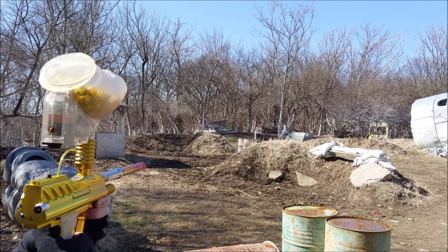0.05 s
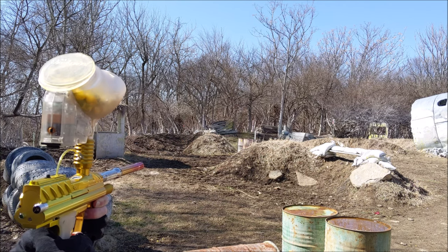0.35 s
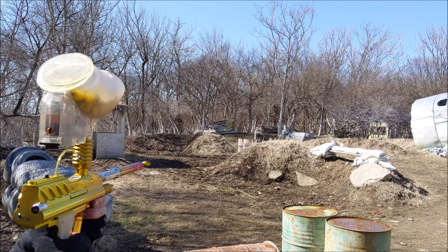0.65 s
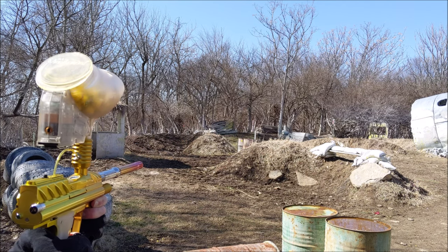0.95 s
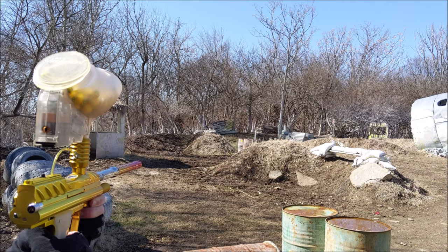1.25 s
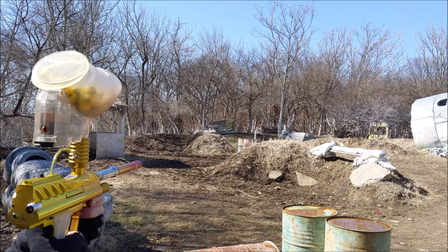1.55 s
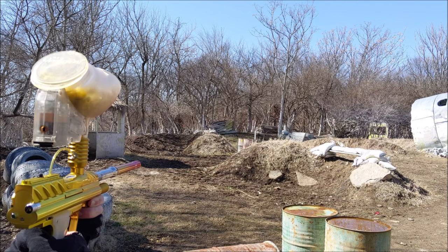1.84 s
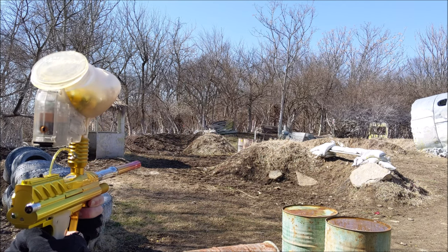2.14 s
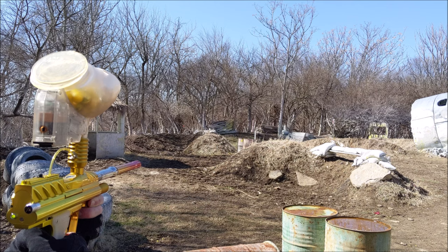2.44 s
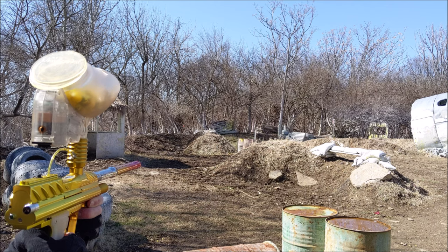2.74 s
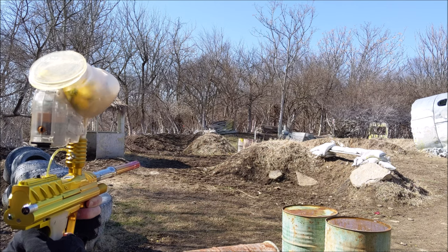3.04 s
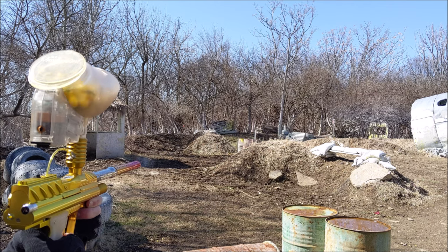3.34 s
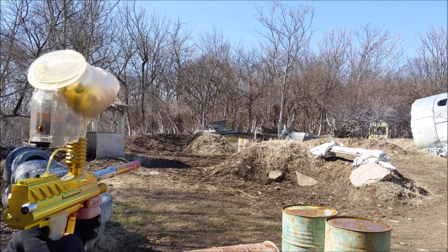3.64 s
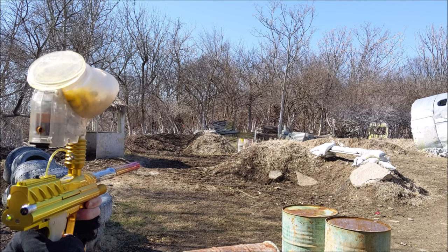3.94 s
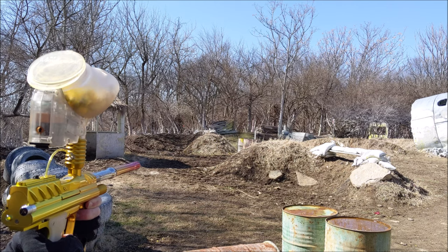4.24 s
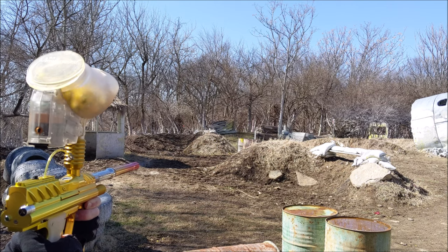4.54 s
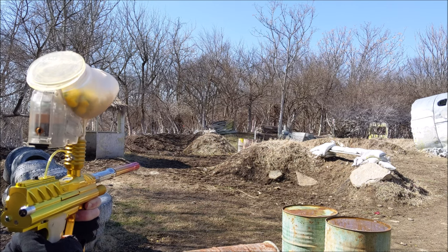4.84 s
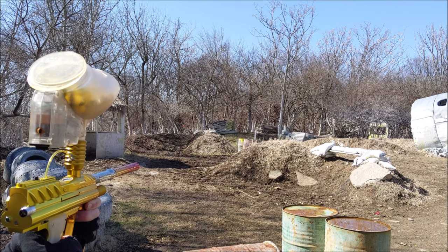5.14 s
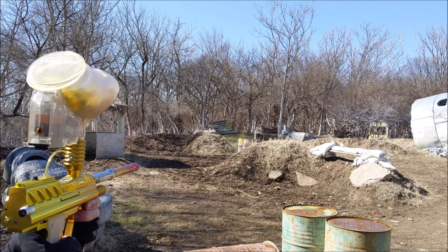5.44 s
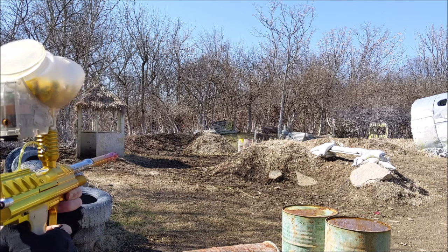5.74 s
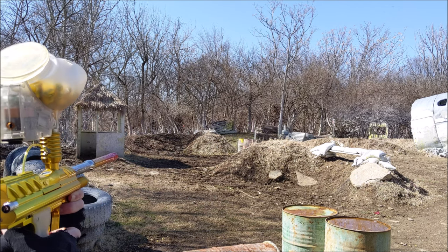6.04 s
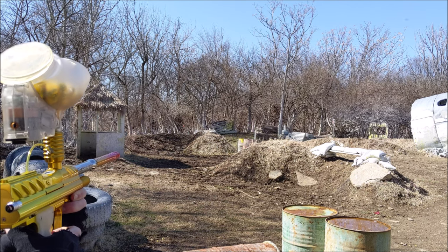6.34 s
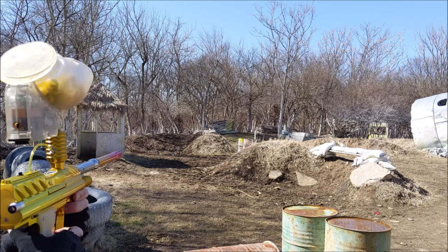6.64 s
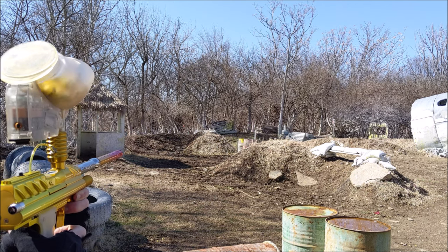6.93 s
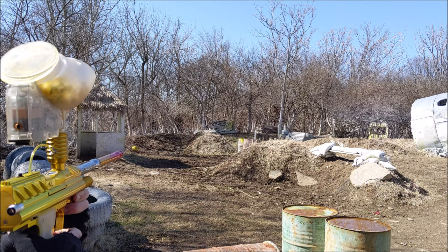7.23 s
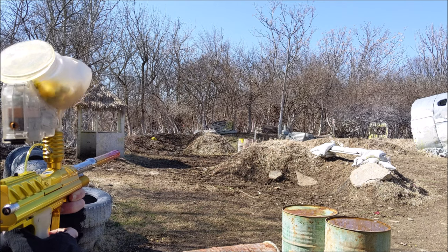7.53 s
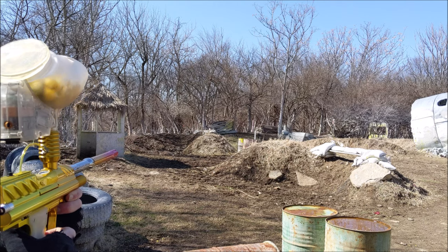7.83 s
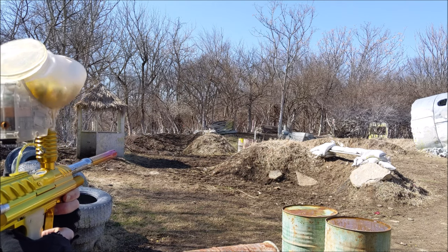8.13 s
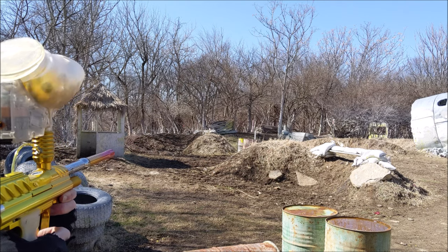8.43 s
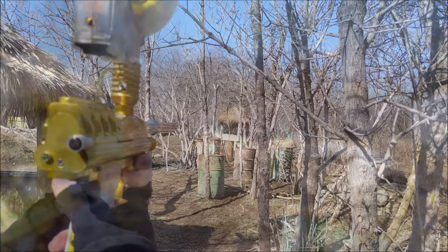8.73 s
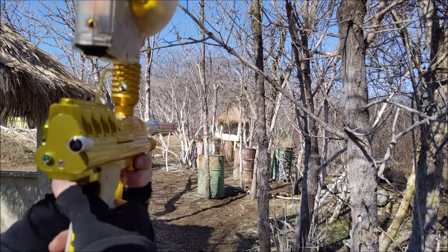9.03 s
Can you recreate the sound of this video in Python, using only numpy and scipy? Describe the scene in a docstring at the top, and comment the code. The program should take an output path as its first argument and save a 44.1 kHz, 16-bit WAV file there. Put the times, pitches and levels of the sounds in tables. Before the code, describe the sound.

A close paintball gun fires three single shots, then two rapid bursts outdoors, with hollow gassy pops and balls splatting on distant metal.

```python
"""A light breeze blows over an open field, and a paintball gun, held close, fires three single shots.
Each shot is a trigger tick, a hollow pop from the barrel, and a crack and hiss of escaping gas.
Ground, hut and woods echo it, and a quarter second later some balls splat on distant sheet metal.
A long burst of shots follows, then a shorter one. Near the end the sound switches abruptly to a
quieter spot, with a few soft bumps of carried gear and one faint, brief tone."""
import sys
import numpy as np
from scipy import signal
from scipy.fft import rfft, irfft, next_fast_len
from scipy.io import wavfile

SR = 44100
rng = np.random.default_rng(int(sys.argv[2]) if len(sys.argv) > 2 else 0)


def put_to_file(sound):
    """Save the sound as 16-bit audio at rate SR, in the file named by the first command-line argument."""
    columns = np.atleast_2d(sound).T  # one column per channel
    safe = np.clip(columns, -1, 1)
    whole_steps = np.round(safe * 32767)
    wavfile.write(sys.argv[1], SR, whole_steps.astype(np.int16))


N = 404838
TIME = np.arange(N) / SR

# A COLOUR table says how strong a noise is at each pitch, compared with its other pitches.
# low rumble of the wind: pitch_hz, level_db
WIND_COLOUR = [(20, -4), (50, 0), (85, -4), (130, -15), (220, -28), (1000, -70)]
# breeze in the trees and faint hiss: pitch_hz, level_db
FIELD_COLOUR = [(30, -5), (120, 1.5), (300, -0.5), (600, -1), (880, -2), (1150, -17.5), (2000, -19),
                (4200, -18.5), (5700, -16), (7600, -10), (8600, -20.5), (9500, -13.5), (13000, -25),
                (16000, -22.5)]
# hush of the quieter spot: pitch_hz, level_db
QUIET_COLOUR = [(15, -38), (25, -17), (175, -21.5), (503, -22), (714, -27.5), (775, -13), (962, -27.5),
                (1480, -27.5), (2110, -39), (2350, -32.5), (4740, -43), (16000, -49)]
# how alike noise is on the left and right: pitch_hz, likeness (1 = the same)
STEREO_LIKENESS = [(60, 1), (130, 0.41), (300, 0), (640, 0.35), (1400, 0), (3000, 0), (16000, 0.0096)]
# soft knocks of carried gear: start_s, level_db
GEAR_BUMPS = [(8.816, -36.5), (8.922, -41), (9.018, -36), (9.064, -44)]
# their dull thud: pitch_hz, level_db
BUMP_COLOUR = [(40, -10.5), (160, -9.5), (350, -20), (1000, -29), (4000, -36)]
# balls that hit the metal squarely: start_s, level_db, ring_db (added to level_db)
SQUARE_HITS = [(0.3747, -26.5, -15), (1.1579, -18.5, 3), (1.9492, -16, -6), (2.815, -21, 1),
               (2.9526, -17, -6), (3.11, -19, -4), (3.2665, -17.5, -8), (4.1813, -21.5, -20),
               (4.479, -16.5, 0.5), (4.782, -17.5, -1), (5.0942, -22.5, -14), (5.2562, -17.5, 1.5),
               (5.3932, -17.5, -9.5), (5.8263, -26.5, -19)]
# a ball bursting on the metal: pitch_hz, level_db
HIT_COLOUR = [(88, -28.5), (150, -10.5), (217, -5.5), (286, -12.5), (321, -12.5), (702, -7.5), (1290, -12),
              (2450, -12), (2870, -8), (4760, -15), (6770, -23), (9630, -18.5), (16000, -27.5)]
# how long the metal shimmers: pitch_hz, fade_s (always the time to fall by 60 dB)
SHIMMER_FADES = [(200, 0.45), (1400, 0.74), (3500, 0.56), (10000, 0.3)]
# clusters of close notes in the metal sheet: pitch_hz, width_hz, level_db
SHEET_NOTES = [(2860, 60, 0), (3170, 140, -8), (3620, 60, -14)]
# sound scattered by the trees: pitch_hz, level_db
WOODS_COLOUR = [(50, -36.5), (150, 4), (230, -0.5), (330, -2.5), (600, -6.5), (900, 2), (1300, -11),
                (3000, -7.5), (5500, -14), (10000, -22.5), (16000, -34)]
# how long it lingers: pitch_hz, fade_s
WOODS_FADES = [(150, 0.8), (900, 1.26), (3000, 0.69), (10000, 1)]
# echoes from far mounds and the tree line: delay_s, level_db, spread_s
FAR_SWELLS = [(0.11, -34, 0.0049), (0.163, -36.5, 0.0047), (.225, -42.5, 0.032)]
# their softened sound: pitch_hz, level_db
SWELL_COLOUR = [(60, -25), (230, -3), (500, -4), (900, 3), (1200, -5), (1550, -4), (2000, -8),
                (3000, -9), (8000, -20), (16000, -32)]
# shots whose puff of air reaches the microphone: start_s, pressure (push +, pull -)
STRONG_PUFFS = [(1.68, 0.21), (2.69, -0.099), (2.84, 0.22), (2.99, 0.098), (4.37, .21), (4.83, 0.12),
                (4.98, -.085), (5.28, -0.088), (5.71, 0.056), (7.10, -0.053), (7.29, 0.085), (7.44, 0.098),
                (8.03, 0.11), (8.18, 0.11)]
# notes of the trigger's knock: pitch_hz, fade_s, level_db
KNOCK_NOTES = [(410, 0.028, -24.0), (950, 0.012, -24.5)]
# a soft, low rush of noise that starts with the knock: pitch_hz, level_db
RUSH_COLOUR = [(150, 7.5), (600, 0.0), (1500, -5.0), (4000, -14.5), (8000, -25), (16000, -39.5)]
# the jet of gas: pitch_hz, left_db, right_db
GAS_COLOUR = [(59.2, -46, -28), (252, 7, 14), (1070, -1, -10.5), (1423, -2.5, 2.5), (1850, -1, -4.5),
              (2910, 6, -1), (4400, -11.5, 4), (5020, -8.5, -6), (5607, -8.5, 4.5), (6710, -16.5, -7.5),
              (7440, -2, 3.5), (8500, -6.5, -7), (9300, -3, -1.5), (12940, -12, -7.5), (16000, -22.5, -8)]
# gas cracks from valve, muzzle, exhaust and bolt: delay_s, left_db, right_db, fade_s
GAS_CRACKS = [(-.0018, -39.5, -30.5, 0.0085), (.0007, -25, -16.5, 0.0081), (.0025, -7, -9.5, 0.0098),
              (.0062, -11, -14, 0.013)]
# notes of the air in the gun's barrel and body: pitch_hz, rise_s, left_db, right_db
BARREL_NOTES = [(134.5, 0.0033, -13.5, -12), (499.3, 0.0013, -20.5, -9), (593, 0.002, -7.5, -30.5),
                (880.3, 0.0018, -9, -14.5), (978.3, 0.0021, -26, -10.5), (1572, 0.0022, -22, -20.5),
                (2233, 0.0016, -34, -21.5), (2880, 0.001, -23, -31)]
# echoes from body, ground and hut: delay_s, cutoff_hz, left_db, right_db
NEAR_ECHOES = [(.00323, 520, -14, -2), (.0052, 370, -24, -4), (.00825, 550, -10, -1),
               (.0187, 830, -20, -8.5), (.0212, 1550, -12.5, -8.5)]
# the pop scattered by nearby clutter: pitch_hz, level_db
CLUTTER_COLOUR = [(60, -30), (130, -14), (240, 0), (300, -5), (380, 2), (560, 0), (700, -9),
                  (950, -8), (1300, -24), (4000, -45)]
# trigger pulls, one shot each: start_s, gas_db
TRIGGER_PULLS = [(0.1187, 3.5), (0.894, 5.5), (1.6799, 7.5), (2.545, 5), (2.6922, 2.5), (2.8435, 6.5),
                 (2.9936, 4.5), (3.1497, 2.5), (3.3017, 3), (3.4611, 1), (3.6123, 3.5), (3.7699, -0.5),
                 (3.923, 3.5), (4.0799, 5), (4.2212, 3.5), (4.374, 4.5), (4.5208, 4.5), (4.6763, 3.5),
                 (4.8297, 6.5), (4.9836, 5), (5.1306, 4), (5.2761, 5), (5.4278, 4), (5.5722, 1.5),
                 (5.7114, 5.5), (6.6364, 7.0), (6.914, 5.5), (7.102, 7), (7.2907, 1), (7.4443, 3),
                 (7.5891, 3), (7.7387, 4.5), (7.8811, 3.5), (8.0313, 5.5), (8.181, 5), (8.3309, 5.5),
                 (8.594, 6)]

GROUND_ECHO_S, HUT_ECHO_S = .00825, .0212
GUN_ASIDE_S, GUN_ASIDE_DB = 5.4, -0.5   # the gun is moved aside, so its pop arrives weaker
QUIET_SPOT_S = 8.865


def from_db(db):
    """Turns decibels into a number to multiply by."""
    return 10 ** (np.asarray(db) / 20)


def unit_level(x):
    """Scales a sound to an average power of 1."""
    return x / np.sqrt(np.mean(x ** 2) + 1e-20)


def at_hz(table, hz):
    """Reads between a table's rows, with octaves evenly spaced."""
    table = np.array(table)
    return np.interp(np.log(np.maximum(hz, 1)), np.log(table[:, 0]), table[:, 1])


def nearest(times, moments):
    """Finds which of the times is closest to each moment."""
    return np.abs(np.subtract.outer(moments, times)).argmin(axis=1)


def lowpass(x, hz, order=2):
    """Dulls a sound by turning down what lies above hz."""
    return signal.sosfilt(signal.butter(order, min(hz, .45 * SR), fs=SR, output="sos"), x + 1e-18)


def delayed(x, delay_s):
    """Makes a stereo sound start later."""
    return np.pad(x, ((0, 0), (int(delay_s * SR), 0)))[:, :x.shape[1]]


def clicks(times, heights):
    """Puts one click at each time."""
    out = np.zeros(N)
    out[np.clip(np.round(np.asarray(times) * SR).astype(int), 0, N - 1)] = heights
    return out


def play_at(times, gains, sound):
    """Starts a copy of the sound at each time."""
    return signal.fftconvolve([clicks(times, gains)], np.atleast_2d(sound), axes=1)[:, :N]


def fading(times, gains, fade_s):
    """A loudness curve that jumps at each time, then fades; overlaps add in power."""
    power_kept = from_db(-60 / (fade_s * SR)) ** 2
    return np.sqrt(signal.lfilter([1], [1, -power_kept], clicks(times, gains ** 2) + 1e-18))


def noise(left, right=None):
    """Stereo noise, alike in the bass, with one colour for both sides or one for each."""
    size = next_fast_len(N)
    hz = np.arange(size // 2 + 1) * SR / size
    shared, opposite = rfft(rng.standard_normal((2, size)))
    alike = np.clip(at_hz(STEREO_LIKENESS, hz), -1, 1)
    both = np.sqrt(1 + alike) * shared + np.sqrt(1 - alike) * opposite * [[1], [-1]]
    colour = from_db([at_hz(left, hz), at_hz(left if right is None else right, hz)])
    return unit_level(irfft(both * colour, size)[:, :N])


def fading_noise(times, gains, colour, fades):
    """Bursts of noise in which each octave fades at its own speed."""
    rest, out = noise(colour), 0
    for hz in 250 * 2. ** np.arange(7):
        split = signal.butter(2, min(hz * np.sqrt(2), .45 * SR), fs=SR, output="sos")
        band = signal.sosfiltfilt(split, rest)
        rest = rest - band
        out = out + band * fading(times, gains, at_hz(fades, hz))
    return out


def wind():
    """A light breeze rumbles, then eases to a steady level."""
    level_db = np.interp(TIME, [.9, 1.3], [-47.5, -50.5])
    return from_db(level_db) * noise(WIND_COLOUR)


def quiet_spot(tone_hz=783, peak_s=8.98, width_s=0.036):
    """A steady hush, in which a thin, distant tone briefly swells and fades."""
    swell = np.exp(-((TIME - peak_s) / width_s) ** 2)
    tone = from_db(-47) * swell * np.sin(2 * np.pi * tone_hz * TIME)
    return from_db(-53.5) * noise(QUIET_COLOUR) + tone


def gear_bumps():
    """Carried gear knocks dully."""
    times, level_db = np.transpose(GEAR_BUMPS)
    return lowpass(noise(BUMP_COLOUR) * fading(times, from_db(level_db), fade_s=0.2), hz=1200)


def ball_landings(times, flight_s=.262):
    """After its flight, each ball faintly grazes the metal or hits it squarely."""
    late, loud = rng.standard_normal((len(times), 2)).T
    start_s = times + flight_s + 0.0078 * late
    level_db = -46.5 + 14 * loud
    ring_db = np.full(len(times), -24)
    hits = np.column_stack([start_s, level_db, ring_db])
    hits[nearest(times + flight_s, np.array(SQUARE_HITS)[:, 0])] = SQUARE_HITS
    return hits


def splats(hits):
    """Balls crack open on sheet metal, which shimmers and rings near one pitch."""
    times, level_db, ring_db = np.transpose(hits)
    gains = from_db(level_db)
    crack = from_db(-3.5) * noise(HIT_COLOUR) * fading(times, gains, fade_s=0.013)
    shimmer = from_db(-9.5) * fading_noise(times, gains, HIT_COLOUR, SHIMMER_FADES)
    ring = 0
    for hz, width_hz, db in SHEET_NOTES:
        band = signal.butter(2, [hz - width_hz / 2, hz + width_hz / 2], "band", fs=SR, output="sos")
        ring = ring + from_db(db) * unit_level(signal.sosfilt(band, rng.standard_normal((2, N))))
    # the ring builds up as waves cross the sheet
    build_up = lowpass(fading(times, from_db(level_db + ring_db), fade_s=0.54), hz=9.0, order=1)
    ring = from_db(-15.0) * ring * build_up
    return (crack + shimmer + ring) * from_db([[-1], [1]])   # a little to the right


def over_ground(x):
    """Soft ground bounces back the low pitches, which makes a sound hollow."""
    return (x + .65 * delayed(lowpass(x, hz=700), GROUND_ECHO_S)) / np.sqrt(2)


def woods_echo(times):
    """Trees scatter each shot into a long tail; mounds and the tree line send back soft swells."""
    tail = from_db(-32.0) * fading_noise(times + 0.01, 1, WOODS_COLOUR, WOODS_FADES)
    swells = sum(from_db(db) * np.exp(-((TIME[:SR] - delay_s) / spread_s) ** 2)
                 for delay_s, db, spread_s in FAR_SWELLS)
    far_echo = noise(SWELL_COLOUR)[:, :SR] * swells
    return over_ground(tail + play_at(times, 0.98, far_echo))


def air_puffs(times):
    """Each shot stirs the air; some blow right at the microphone, which swings slowly back to rest."""
    pressures = 0.017 * rng.standard_normal(len(times))
    strong_times, strong_pressures = np.transpose(STRONG_PUFFS)
    pressures[nearest(times, strong_times)] = strong_pressures
    t = TIME[:SR // 2]
    push = 2.6 * (1 - np.exp(-t / .007)) ** 2 * np.exp(-t / .045) * np.cos(2 * np.pi * 5.2 * t)
    return play_at(times + .002, pressures, push)


def trigger(times, lead_s=0.0172):
    """A catch lets go with a small knock; a soft, low rush starts with it and lingers after the shot."""
    t = TIME[:SR // 20]
    knock = sum((-1) ** k * from_db(db - 60 * t / fade_s) * np.sin(2 * np.pi * hz * t)
                for k, (hz, fade_s, db) in enumerate(KNOCK_NOTES))
    rush = from_db(-38) * noise(RUSH_COLOUR) * fading(times - lead_s, 1, fade_s=0.22)
    return play_at(times - lead_s, 0.55, knock) + rush


def escaping_gas(times, gas_db):
    """Gas cracks out as valve and bolt open, then hisses away; the hut echoes both."""
    jet = np.array(GAS_COLOUR)
    fresh, pattern = (noise(jet[:, [0, 1]], jet[:, [0, 2]]) for _ in range(2))
    # half of the cracks' power is the same noise on every shot, so they sound alike
    repeated = play_at(times + GAS_CRACKS[0][0], 1, pattern[:, :SR // 8])
    crack_power = 0
    for delay_s, left_db, right_db, fade_s in GAS_CRACKS:
        crack = fading(times + delay_s, from_db(.5 * gas_db), fade_s)
        crack_power = crack_power + (from_db([[left_db], [right_db]]) * crack) ** 2
    hiss = from_db([[-26], [-23]]) * fading(times + 0.0052, from_db(gas_db), fade_s=0.21)
    gas = repeated * np.sqrt(crack_power / 2) + fresh * np.sqrt(crack_power / 2 + hiss ** 2)
    return gas + from_db(-16.5) * delayed(gas, HUT_ECHO_S)


def pitch_drop(x, hz=480, width_hz=650):
    """An all-pass filter makes the lows arrive late, so a pop drops in pitch."""
    radius = np.exp(-np.pi * width_hz / SR)
    feedback = [1, -2 * radius * np.cos(2 * np.pi * hz / SR), radius * radius]
    return signal.lfilter(feedback[::-1], feedback, x)


def muzzle_pop(times):
    """A slug of gas swells and rings in the barrel; nearby things send back duller copies."""
    t = TIME[:SR // 4]
    pop = 0
    for hz, rise_s, left_db, right_db in BARREL_NOTES:
        swell = t / rise_s * np.exp(1 - t / rise_s)
        pop = pop + from_db([[left_db], [right_db]]) * swell * np.sin(2 * np.pi * hz * t)
    pop = pitch_drop(pop)
    echoes = sum(from_db([[left_db], [right_db]]) * delayed(lowpass(pop, cutoff_hz), delay_s)
                 for delay_s, cutoff_hz, left_db, right_db in NEAR_ECHOES)
    clutter = noise(CLUTTER_COLOUR) * fading([.027], 1, fade_s=0.12)
    echoes += from_db(-26) * over_ground(clutter[:, :len(t)])
    gains = from_db(rng.normal(-0.7, 0.21, len(times)))
    return play_at(times - .0007, gains, pop + echoes)


def scene():
    """The shooting field, then abruptly the quieter spot; wind runs through both."""
    times, gas_db = np.transpose(TRIGGER_PULLS)
    pops = (muzzle_pop(times) + woods_echo(times)) * from_db(GUN_ASIDE_DB * (TIME > GUN_ASIDE_S))
    gun = pops + escaping_gas(times, gas_db) + trigger(times) + air_puffs(times)
    field = gun + splats(ball_landings(times)) + from_db(-56) * noise(FIELD_COLOUR)
    return np.where(TIME < QUIET_SPOT_S, field, quiet_spot()) + gear_bumps() + wind()


def record(dry):
    """Rounds off the loudest peaks and cuts the highest treble."""
    rounded = dry / (1 + (dry / .8) ** 4) ** .25
    treble_cut = signal.ellip(10, .2, 70, 16000, fs=SR, output="sos")
    return signal.sosfilt(treble_cut, rounded)


dry = scene()
out = record(dry)
put_to_file(out)
```